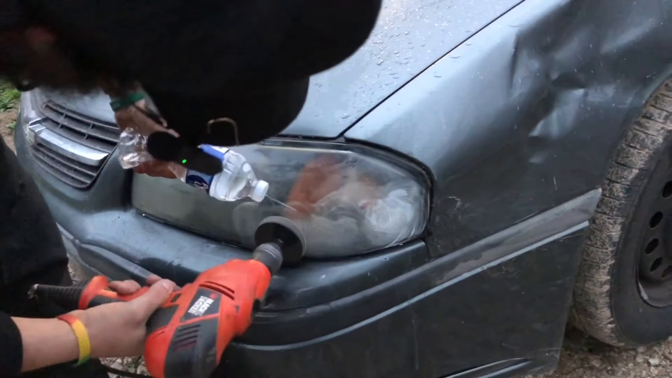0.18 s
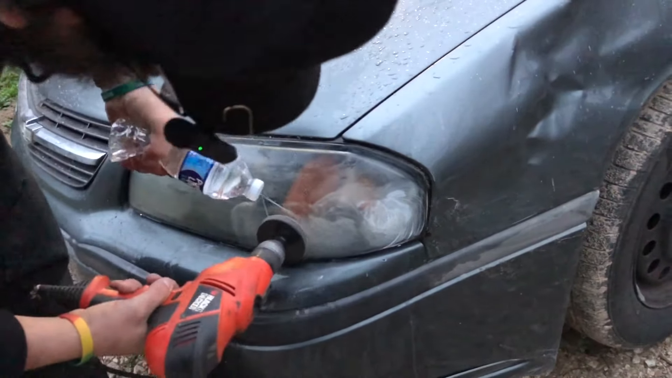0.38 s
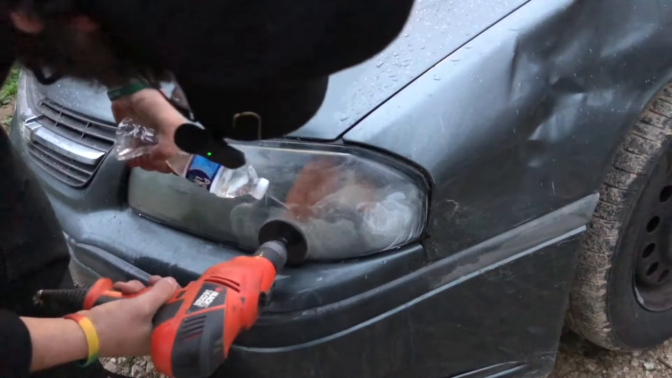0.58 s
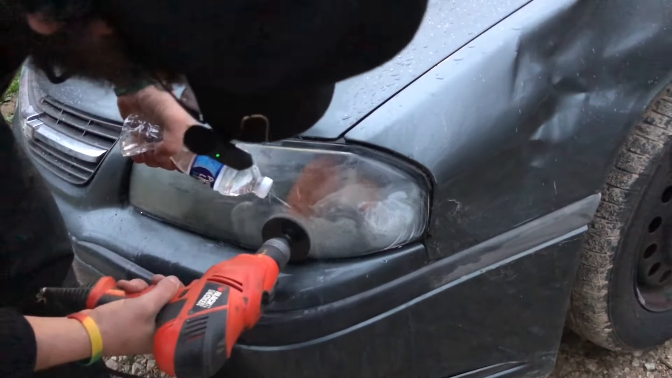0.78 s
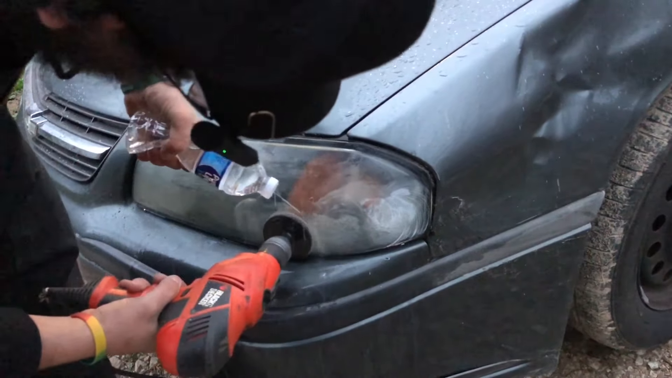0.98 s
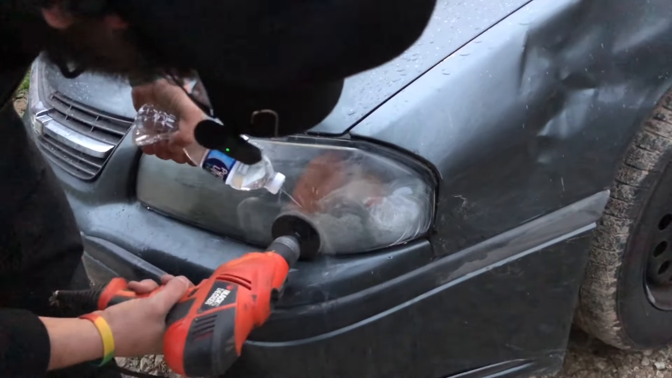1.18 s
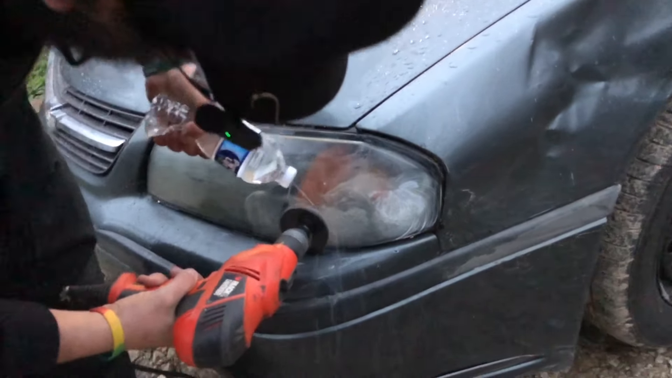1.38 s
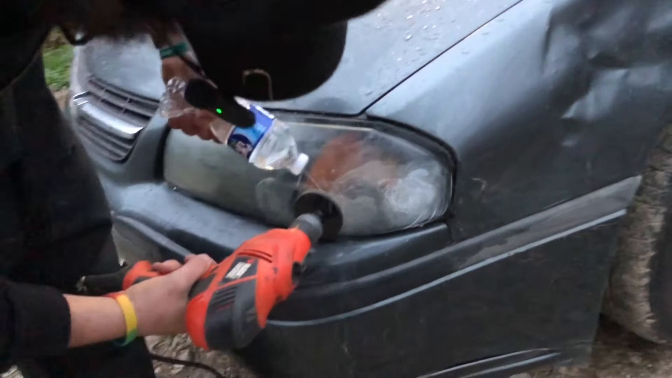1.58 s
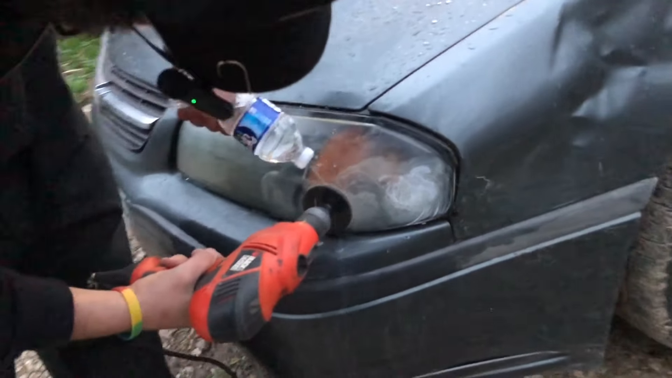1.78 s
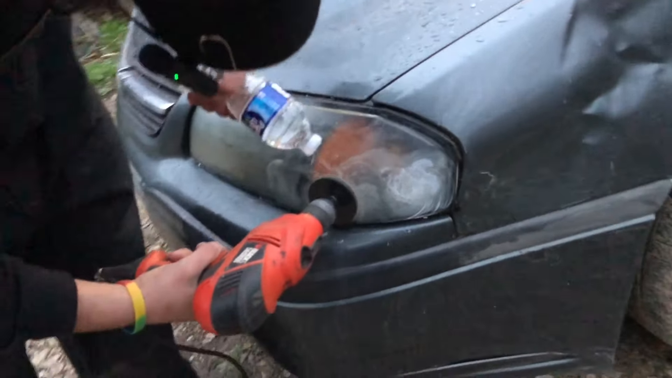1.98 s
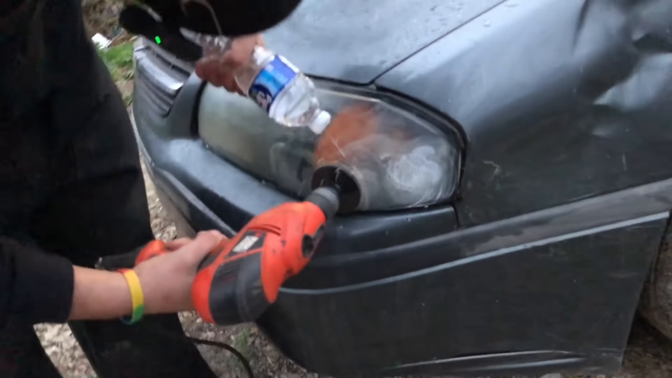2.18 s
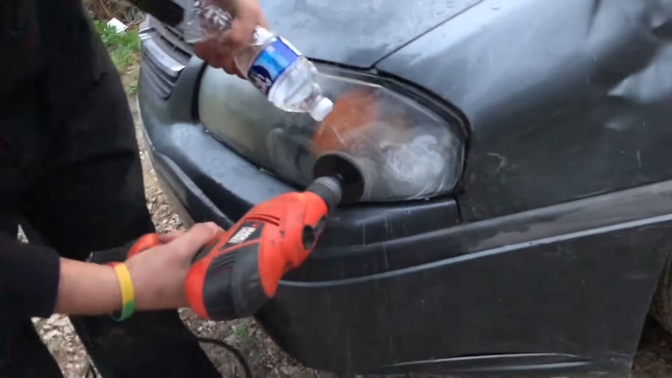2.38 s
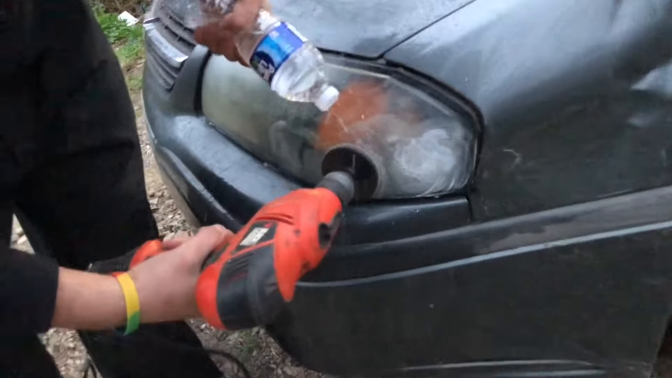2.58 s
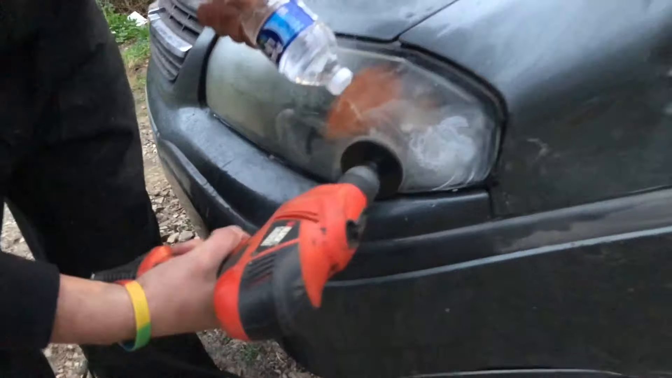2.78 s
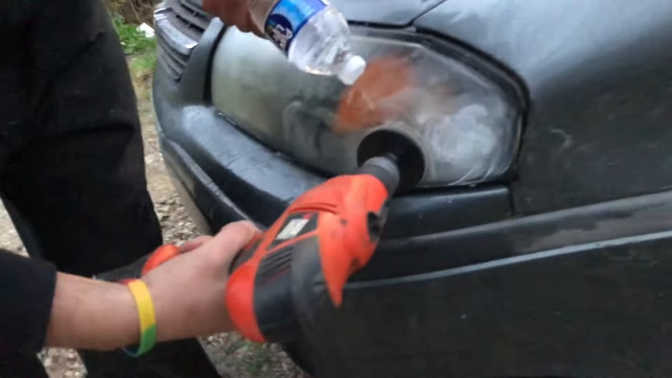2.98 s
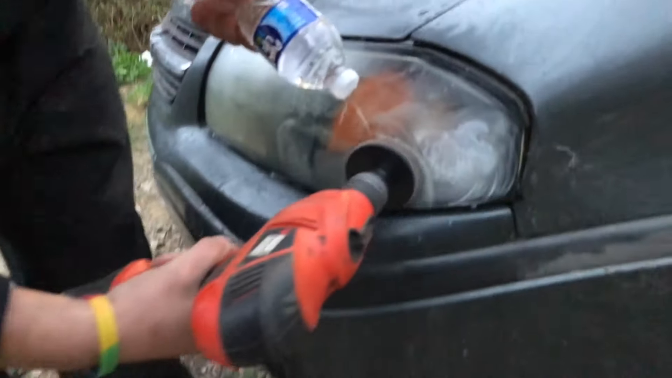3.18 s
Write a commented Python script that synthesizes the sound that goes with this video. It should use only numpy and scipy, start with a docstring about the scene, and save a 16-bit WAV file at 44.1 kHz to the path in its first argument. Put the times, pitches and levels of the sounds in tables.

```python
"""A corded drill runs up to full speed and whirs: sines at multiples of the shaft speed give its rotor,
gear and fan tones and commutator whine, and coloured noise its rush. A wet sanding disc on the drill rubs a
plastic headlight (rough noise) and rings its lens (noise through resonances). A mains-rate rattle is
strongest early on and falls to a faint level. The microphone starts close, is bumped a few times
(damped sines) and draws away; low rumble lies beneath."""
import sys
import numpy as np
from scipy.fft import rfft, irfft, next_fast_len
from scipy.io import wavfile
from scipy.ndimage import map_coordinates

SR = 44100
rng = np.random.default_rng(int(sys.argv[2]) if len(sys.argv) > 2 else 0)


def master_out(mix):
    """Clip the mix to full scale and print it as 16-bit PCM to the path in sys.argv[1]."""
    frames = np.transpose(np.atleast_2d(mix))
    ceiling = np.clip(frames, -1, 1)
    pcm = np.round(ceiling * 32767).astype(np.int16)
    wavfile.write(sys.argv[1], SR, pcm)


N = 141120
TIME = np.arange(N) / SR  # s

MAINS_HZ = 60  # rate of the current pulses
PULSE_START_S = 0.00622
GEAR_ORDER, FAN_ORDER = 5.267, 9  # cycles per shaft turn
TOP_HZ = 15600  # upper band limit


def amp(db):
    """Level to gain: 20 dB is a factor of ten in amplitude."""
    return 10 ** (np.asarray(db) / 20)


def unit(x):
    """Normalization: scale to rms 1."""
    return x / np.sqrt(np.mean(x ** 2) + 1e-20)


def curves(rows):
    """Linear interpolation: one value per sample for each column after the time."""
    s, *columns = np.transpose(rows)
    return [np.interp(TIME, s, column) for column in columns]


def wobble(rate):
    """Slow random modulation: a smooth curve through rate random knots a second."""
    return map_coordinates(rng.standard_normal(4096), [TIME * rate], mode="wrap")


def swell(s, half_s):
    """Gaussian envelope: a smooth rise and fall around time s, height 1, down to 1/e at half_s."""
    return np.exp(-((TIME - s) / half_s) ** 2)


def filtered(x, response):
    """Linear filtering: the spectrum of x times a response of frequency."""
    m = next_fast_len(N + SR // 2)
    return irfft(rfft(x, m) * response(np.fft.rfftfreq(m, 1 / SR)), m)[:N]


def coloured(x, points):
    """Spectral shaping: x through a colour of (f/Hz, level/dB) points on a log axis, at rms 1."""
    f, db = np.transpose(points)
    return unit(filtered(x, lambda hz: amp(np.interp(np.log(hz + 1), np.log(f + 1), db))))


def grit(rough_db, rate):
    """Amplitude-modulated noise: random level changes clump it into short scratches, at rms 1."""
    return unit(rng.standard_normal(N) * amp(rough_db * wobble(rate)))


def receding(x, close, far, away):
    """Crossfade of spectra: the colour of x passes from close to distant with the share away."""
    return (1 - away) * coloured(x, close) + away * coloured(x, far)


def ringing(hz, width_hz):
    """Resonance: noise through two equal bandpass stages in cascade, at rms 1."""
    def response(f):
        one_stage = 1j * f * width_hz / (hz * hz - f * f + 1j * f * width_hz)
        return one_stage ** 2
    return unit(filtered(rng.standard_normal(N), response))


def shaft_speed():
    """Pulsed acceleration: the motor gains speed in small steps, one on each pulse of current."""
    # motor shaft speed: t/s, speed/(turns per second)
    speed_points = [(0, 70), (.18, 156), (.4, 241), (.55, 290), (.6, 328), (.7, 381), (.8, 413), (.98, 444),
                    (1.12, 457), (1.32, 465), (1.95, 465), (2.5, 470.3), (3.05, 466), (3.2, 467.5)]
    pulse = np.floor((TIME - PULSE_START_S) * MAINS_HZ)
    pulse_middle_s = PULSE_START_S + (pulse + .5) / MAINS_HZ
    return np.interp(pulse_middle_s, *np.transpose(speed_points))


def tones(angle, speed, away):
    """Harmonic excitation: shaft-locked tones shake and swell across the housing's resonances."""
    # tones per shaft turn: order/(cycles per turn)
    orders = [1, 2, GEAR_ORDER, 7.9, 8, FAN_ORDER]
    # base level of each order against the motor rush: close level/dB, distant level/dB
    order_levels = [(-12, -31.5), (-9, -25.5), (-12, -13), (-6.5, -15), (-10.5, -13), (-3, -1.5)]
    # the gear tone sings out briefly: t/s, half length/s, rise/dB
    gear_swells = [(2.11, .06, 8), (2.365, .04, 11), (2.81, .06, 9), (2.955, .025, 12)]
    # change in the fan-blade tone: t/s, level/dB
    fan_level = [(1.45, -1), (1.78, 3), (2.25, -1), (2.83, 4.5), (3.03, -11), (3.1, 3.5)]
    # how well the housing radiates a tone: f/Hz, level/dB
    housing = [(330, -16), (430, -3), (580, 5.5), (680, -13), (860, 2.5), (1800, 3), (2150, 6.5),
               (2460, -1.5), (3300, -9), (3690, -0.5), (3950, -5.5), (4190, -3)]
    waver_db = 2.2
    shaft_jitter_rad, gear_jitter_rad = .05, .33  # shaft jitter is multiplied by each order

    shaken = angle + shaft_jitter_rad * wobble(130)
    gear_rise_db = sum(db * swell(s, half_s) for s, half_s, db in gear_swells)
    extra_db = {GEAR_ORDER: gear_rise_db, FAN_ORDER: curves(fan_level)[0]}
    out = np.zeros(N)
    for order, (close_db, far_db) in zip(orders, order_levels):
        db = close_db + (far_db - close_db) * away + waver_db * wobble(70)
        db = db + np.interp(order * speed, *np.transpose(housing)) + extra_db.get(order, 0)
        # loose teeth roughen the gear tones, those of fractional order
        play = gear_jitter_rad * wobble(220) * (order != round(order))
        drive = (speed / speed.max()) ** (order / 2 - 1)  # high orders need more speed
        out += drive * amp(db) * np.sqrt(2) * np.sin(order * shaken + play)
    return out


def rush(angle, away, throb=0.074):
    """Broadband flow and gear noise in the housing, amplitude-modulated once a turn."""
    # close colour: f/Hz, level/(dB per Hz)
    rush_close = [(1060, -62), (1800, -7), (2510, -5), (3200, -11.5), (3590, 1), (4620, -3), (5940, -10),
                  (6560, -8), (7780, -14.5), (8360, -9.5), (9310, -20.5), (10800, -18.5), (13700, -18),
                  (15400, -27)]
    # distant colour: f/Hz, level/(dB per Hz)
    rush_far = [(1500, -32), (2400, -10.5), (2750, -15), (3100, -0.5), (3350, -16), (4200, 4), (4450, -3.5),
                (6600, -6.5), (7300, -14.5), (8300, -17), (9300, -23.5), (10500, -15), (15000, -24.5)]
    throbbing = grit(rough_db=0.87, rate=220) * (1 + throb * np.cos(angle))
    return receding(throbbing, rush_close, rush_far, away)


def motor(angle, speed, away, metres):
    """Source power and spreading: rush and tones grow with speed and fall as 1/distance."""
    level_1m_db, growth_db = -26.5 + 1, 13  # rush at full speed, 1 m away; rise per doubling of speed
    doublings = np.log2(speed / speed.max())
    gain = amp(level_1m_db + growth_db * doublings) / metres
    return gain * (rush(angle, away) + tones(angle, speed, away))


def whine(angle, speed):
    """Commutation tone: brushes crossing the bars whistle roughly, up to the band limit."""
    # whine before its flutter: t/s, level/dB
    whine_level = [(.07, -52), (.125, -41), (.16, -52), (.215, -33), (.26, -42), (.31, -34), (.37, -43),
                   (.54, -32), (.65, -37), (.78, -39)]
    bars = 40  # cycles per turn
    flutter = amp(2.5 * wobble(120) + 2.5 * wobble(35))
    whistle = np.sqrt(2) * np.sin(bars * angle + 0.91 * wobble(350))
    return amp(curves(whine_level)[0]) * flutter * whistle * (bars * speed < TOP_HZ)


def rubbing_gain(speed, metres):
    """Friction power and spreading: rubbing grows with speed and pressure and falls as 1/distance."""
    # how hard the disc rubs: t/s, level/dB
    pressure = [(.1, -4), (.45, -1.5), (.62, 1.5), (.85, 1), (1.3, -0.5), (1.65, 0.5), (1.9, -4.5),
                (2.15, -5.5), (2.45, -10), (2.75, -5.5), (3.2, -4)]
    level_1m_db, growth_db = -26.5, 10.5  # full speed, 1 m, pressure 0 dB; rise per doubling of speed
    doublings = np.log2(speed / speed.max())
    return amp(level_1m_db + growth_db * doublings + curves(pressure)[0]) / metres


def rub(away):
    """Friction noise: the disc's grains scratch the lens at random."""
    # close colour: f/Hz, level/(dB per Hz)
    rub_close = [(70, -65), (110, -32), (400, -9.5), (620, -4), (790, -7.5), (960, 0.5), (1360, -2),
                 (2000, -12), (2600, -4.5), (4400, -120)]
    # distant colour: f/Hz, level/(dB per Hz)
    rub_far = [(88, -63), (400, -18.5), (607, -14), (900, -14.5), (1070, -10.5), (1340, -7.5),
               (1870, -13.5), (2600, -25), (4400, -120)]
    return receding(grit(rough_db=1.0, rate=140), rub_close, rub_far, away)


def lens():
    """Forced resonance: the disc rings two lens modes and scrapes out others where its edge catches."""
    # steady modes: f/Hz, width of each filter stage/Hz
    lens_modes = [(1335, 207), (1630, 102)]
    # their strengths: t/s, low mode level/dB, high mode level/dB
    mode_levels = [(0.501, -36, -52), (1.2, -17.5, -44), (2.12, -16, -34), (2.46, -32.5, -38),
                   (2.75, -37, -43), (2.98, -31.5, -24), (3.13, -35.5, -35), (3.2, -24, -31)]
    # scrapes of the disc's edge: t/s, half length/s, f/Hz, level/dB
    edge_scrapes = [(.87, 0.025, 1106, -20), (2.363, 0.036, 708, -30), (2.49, 0.17, 3820, -27.5),
                    (2.574, .08, 8300, -38.5)]
    scrape_width = 0.11  # width of each filter stage, share of the frequency
    out = np.zeros(N)
    for (hz, width_hz), db in zip(lens_modes, curves(mode_levels)):
        out += amp(db) * ringing(hz, width_hz)
    for s, half_s, hz, db in edge_scrapes:
        out += amp(db) * swell(s, half_s) * ringing(hz, scrape_width * hz)
    return out


def rattle(speed):
    """Impulsive excitation: uneven current pulses jerk the gears, which chatter and ring the gearbox."""
    # rattle on the current pulses: t/s, level/dB
    rattle_level = [(.02, -25.5), (.06, -29), (.11, -30), (.2, -24), (.3, -22.5), (.48, -27), (.72, -37.5)]
    # colour of the chatter: f/Hz, level/(dB per Hz)
    rattle_colour = [(100, -50), (480, -3), (790, -13.5), (1080, -0.5), (1650, -5), (2150, -3),
                     (2600, -0.5), (3200, -7), (4100, 0), (5000, -18), (7000, -12.5), (15000, -44)]
    attack_s, decay_s, scatter_db = 0.0027, 0.0063, 1.2
    # gearbox resonance that the meshing teeth sweep through; level against the chatter
    mesh_order, mesh_hz, mesh_width_hz, mesh_db = 12, 2130, 324, -2

    age = (TIME - PULSE_START_S) % (1 / MAINS_HZ)
    pulses = unit((1 - np.exp(-age / attack_s)) * np.exp(-age / decay_s))
    jerk = pulses * amp(scatter_db * wobble(MAINS_HZ))
    chatter = coloured(grit(rough_db=2.2, rate=1800), rattle_colour)
    in_tune = np.exp(-((mesh_order * speed - mesh_hz) / mesh_width_hz) ** 2)
    mesh_tone = np.sqrt(2) * np.sin(2 * np.pi * mesh_hz * TIME + wobble(245))
    ring = amp(mesh_db) * in_tune * mesh_tone
    return amp(curves(rattle_level)[0]) * jerk * (chatter + ring)


def bumps():
    """Damped oscillation: dull, quickly decaying knocks on the microphone."""
    # soft knocks: t/s, level before onset and decay/dB, f/Hz
    knocks = [(0.091, -34, 122), (0.324, -32.5, 125), (.54, -31, 130), (0.655, -30.5, 121),
              (0.988, -29.5, 80), (1.699, -35, 100)]
    t60_s, onset_s = 0.09, 0.0068
    out = np.zeros(N)
    for s, db, hz in knocks:
        t = np.maximum(TIME - s, 0)
        out += amp(db - 60 * t / t60_s) * (1 - np.exp(-t / onset_s)) * np.sin(2 * np.pi * hz * t)
    return out


def rumble(rub_gain):
    """Low-frequency noise: handling rumble follows the rubbing, outdoor rumble stays steady."""
    # colour: f/Hz, level/(dB per Hz)
    rumble_colour = [(20, -13), (200, -6), (400, -25)]
    handling_db, outdoor_db = -63, -67  # handling is relative to the disc rub
    gain = rub_gain * amp(handling_db) + amp(outdoor_db)
    return gain * coloured(grit(rough_db=-4, rate=24), rumble_colour)


def scene():
    """Superposition: all sources add at one point, the same in both channels."""
    # change from the close tone colour to the distant one: t/s, share/(0 to 1)
    away_share = [(1.75, 0.24), (2.2, 0.46), (2.7, 0.76)]
    # microphone distance: t/s, distance/m
    mic_distance = [(.5, 0.2), (.8, 0.23), (1.9, .22), (2.12, 0.33), (2.3, 0.53), (2.5, 0.83), (2.8, 1.25),
                    (2.9, 1.23), (3.2, 1.34)]
    speed = shaft_speed()
    angle = 2 * np.pi * np.cumsum(speed) / SR  # rad
    away = np.clip(curves(away_share)[0], 0, 1)
    metres = curves(mic_distance)[0]
    rub_gain = rubbing_gain(speed, metres)
    drill = motor(angle, speed, away, metres) + whine(angle, speed) + rattle(speed)
    disc = rub_gain * rub(away) + lens()
    mono = drill + disc + bumps() + rumble(rub_gain)
    return np.array([mono, mono])


def record(dry):
    """Saturation and band limiting: the highest peaks are rounded, then the top band is cut."""
    clip_top = 1.08  # ceiling of the rounded peaks
    held = dry / (1 + np.abs(dry / clip_top) ** 8) ** (1 / 8)
    return np.array([filtered(channel, lambda hz: hz < TOP_HZ) for channel in held])


dry = scene()
out = record(dry)
master_out(out)
```